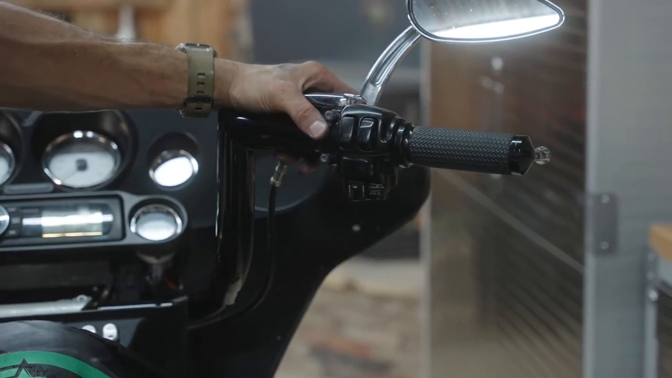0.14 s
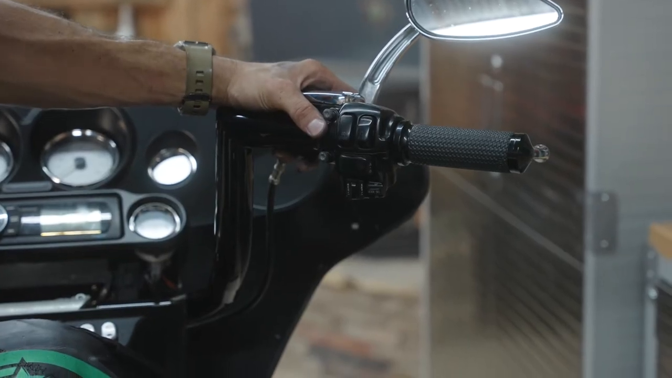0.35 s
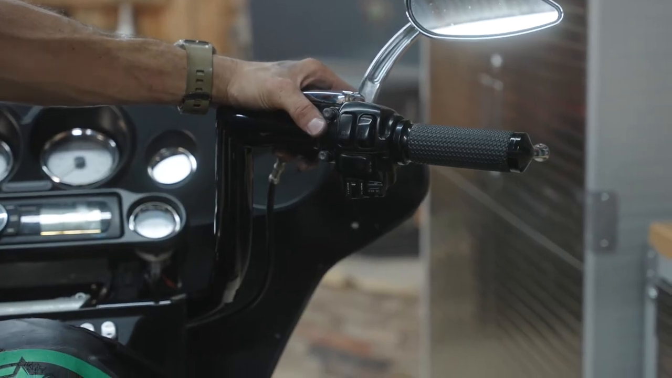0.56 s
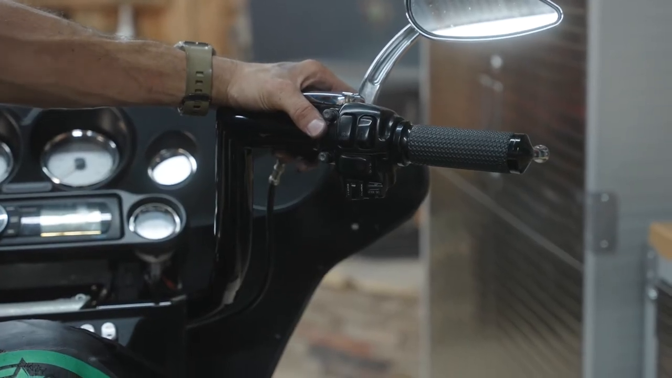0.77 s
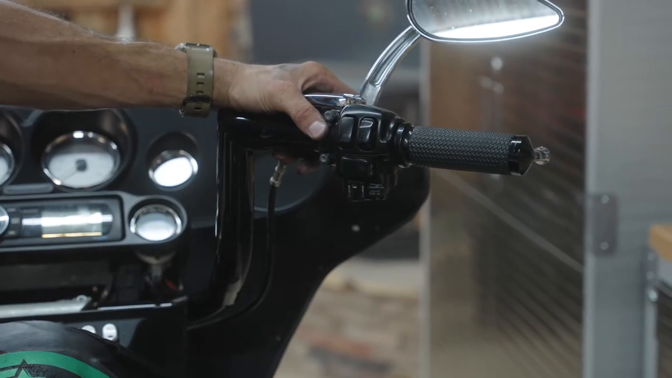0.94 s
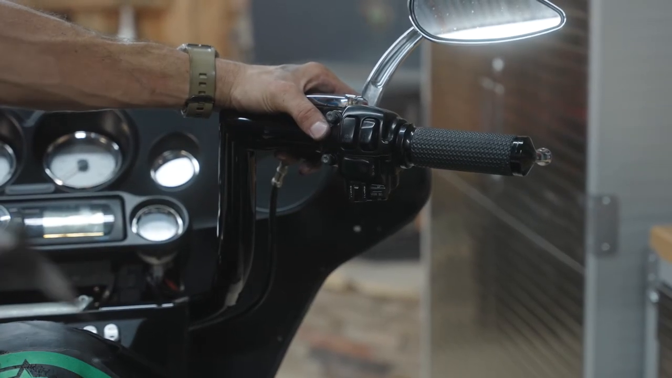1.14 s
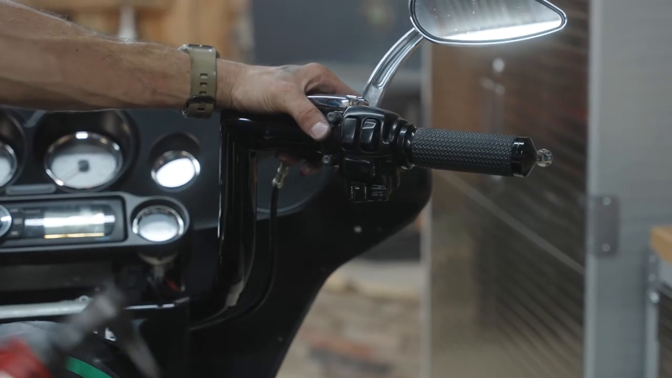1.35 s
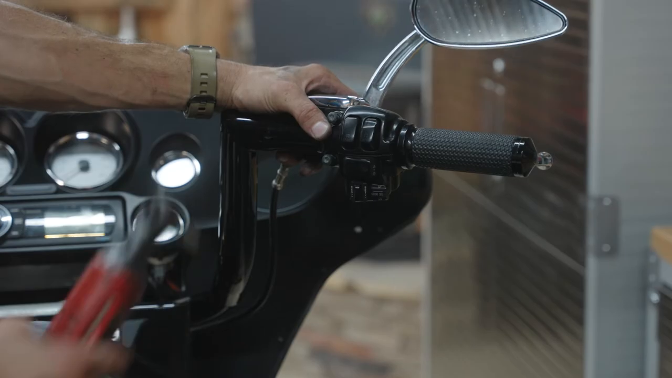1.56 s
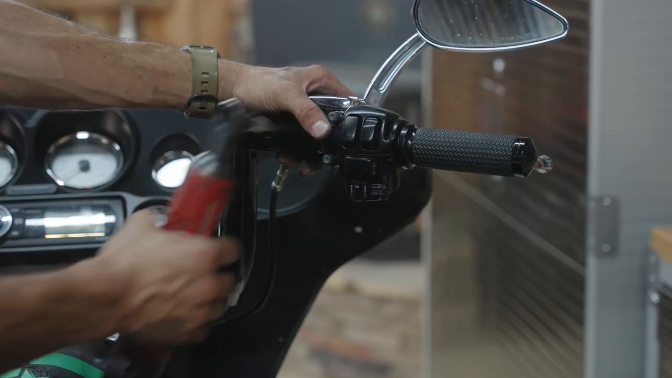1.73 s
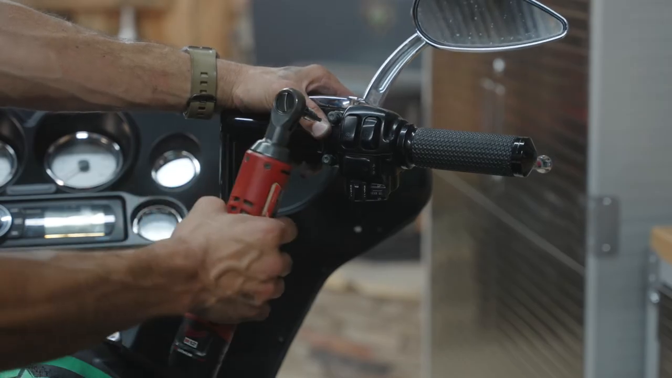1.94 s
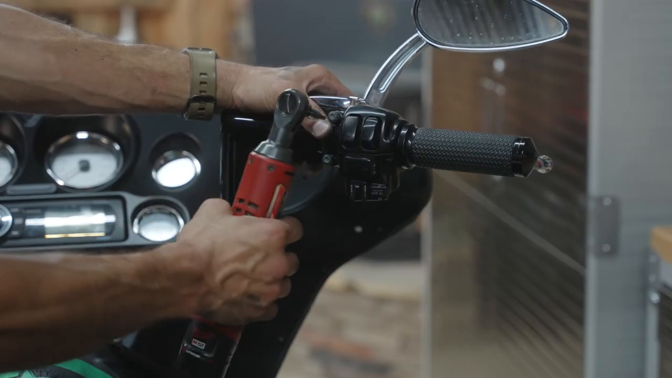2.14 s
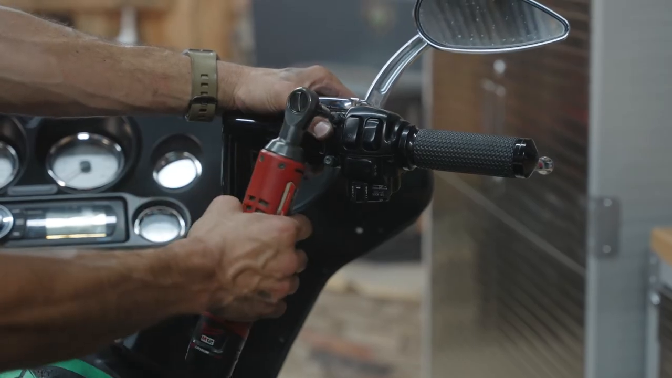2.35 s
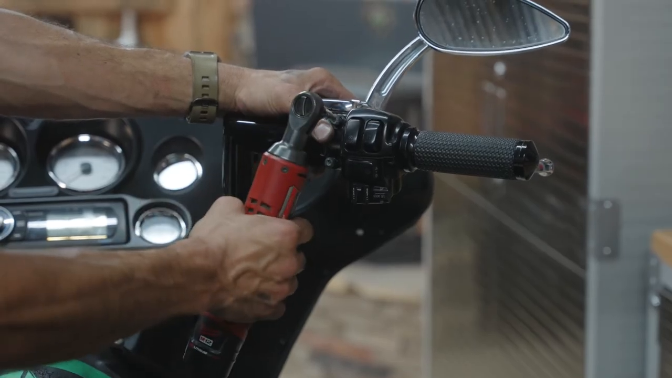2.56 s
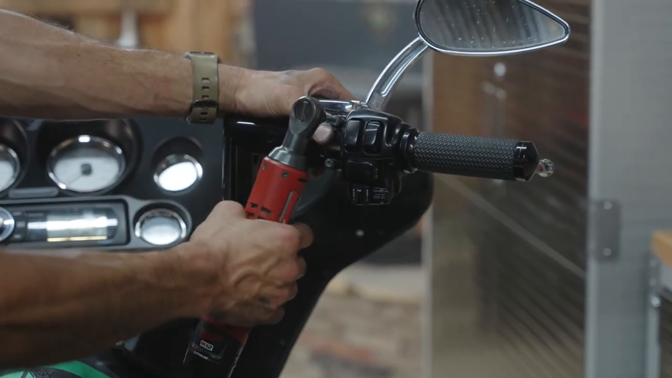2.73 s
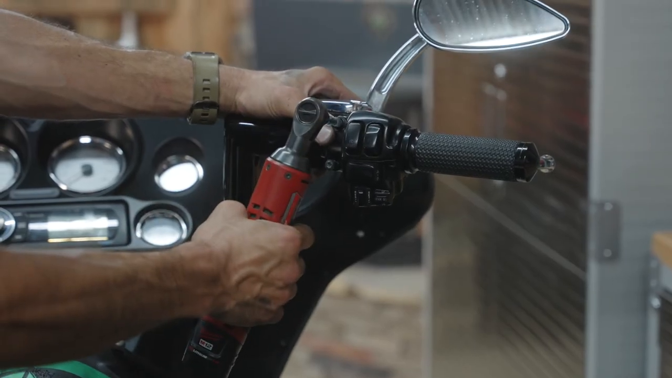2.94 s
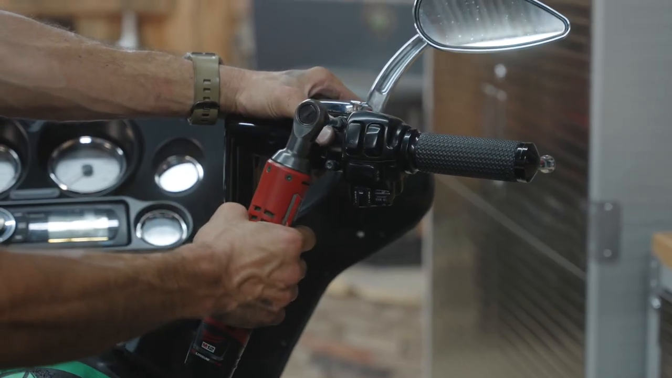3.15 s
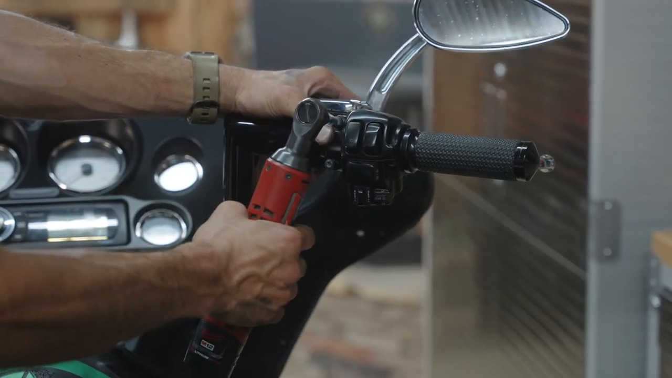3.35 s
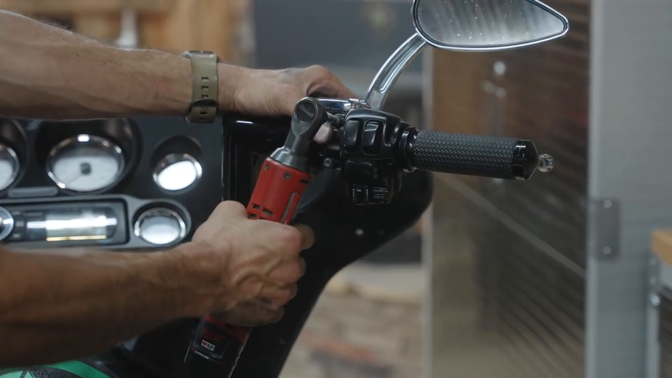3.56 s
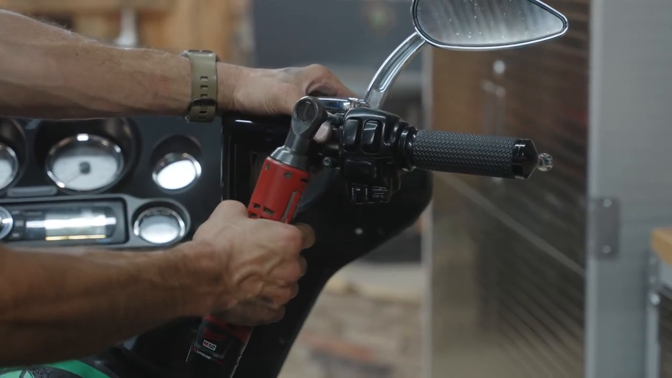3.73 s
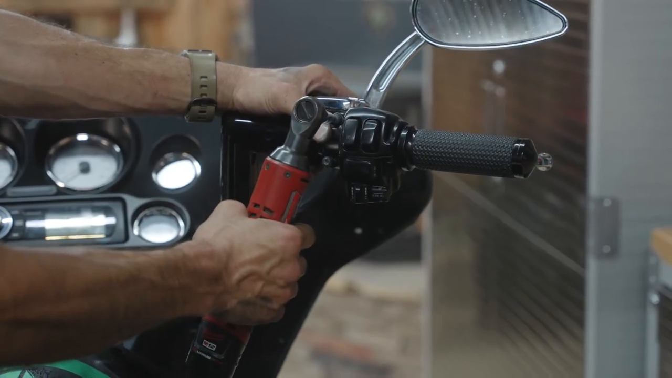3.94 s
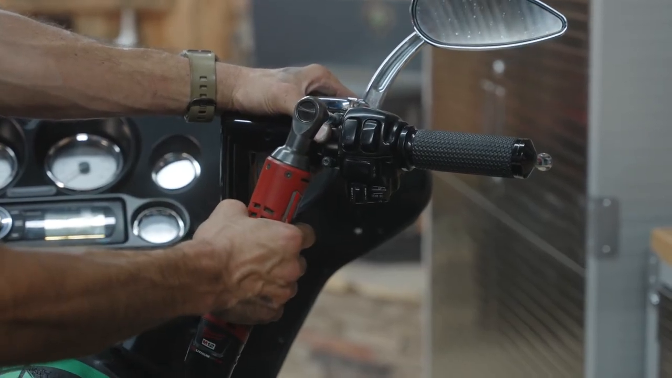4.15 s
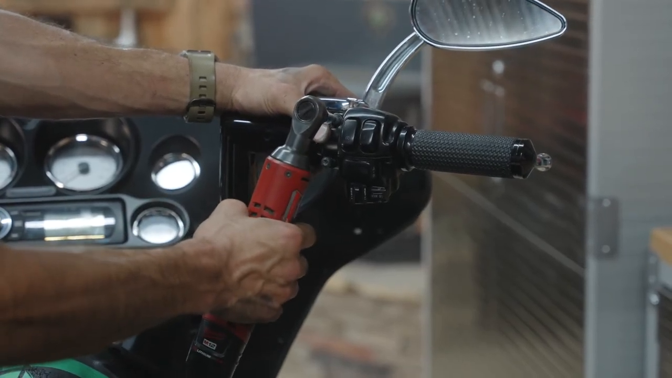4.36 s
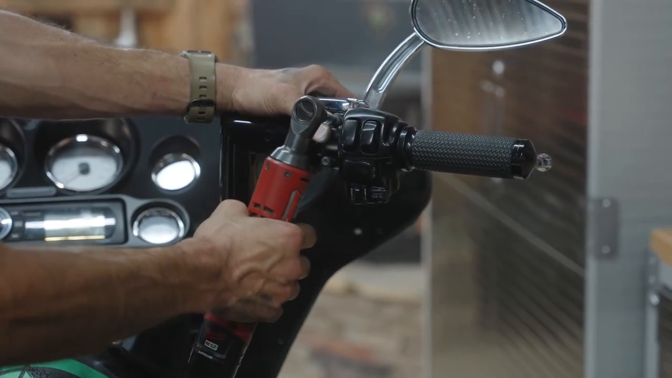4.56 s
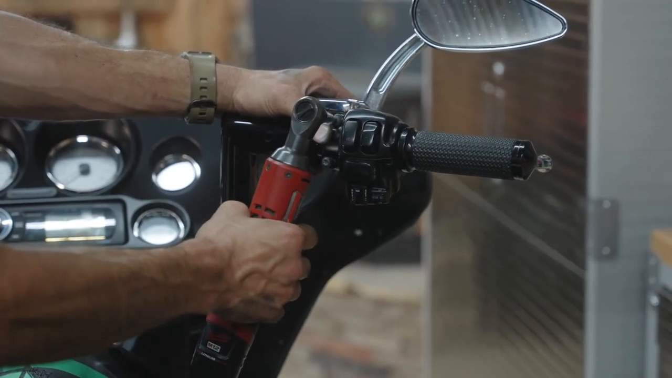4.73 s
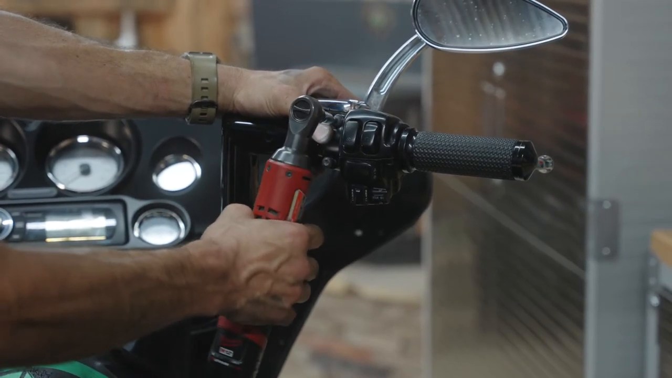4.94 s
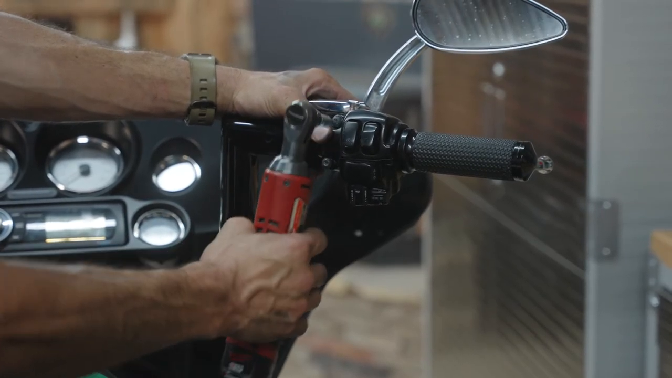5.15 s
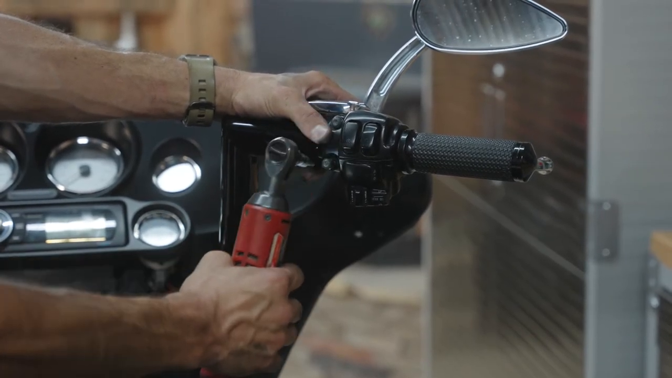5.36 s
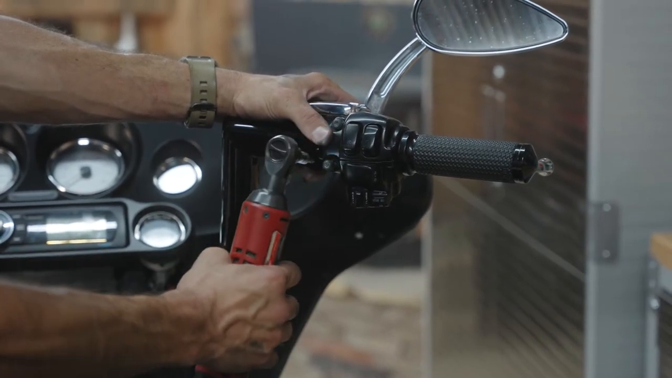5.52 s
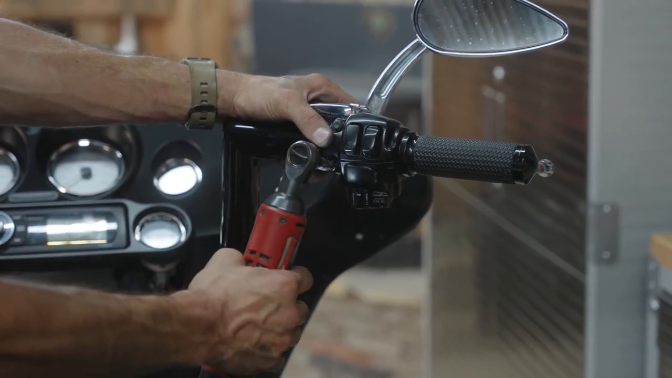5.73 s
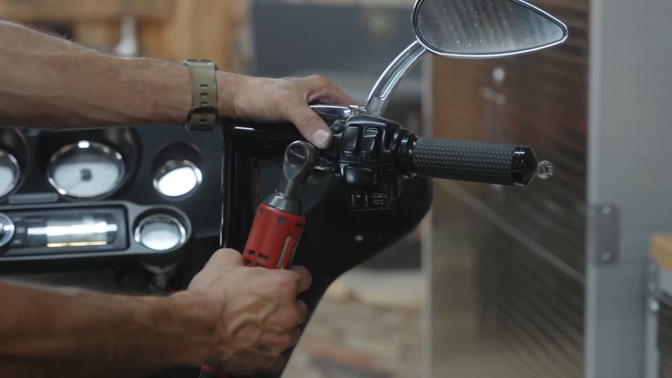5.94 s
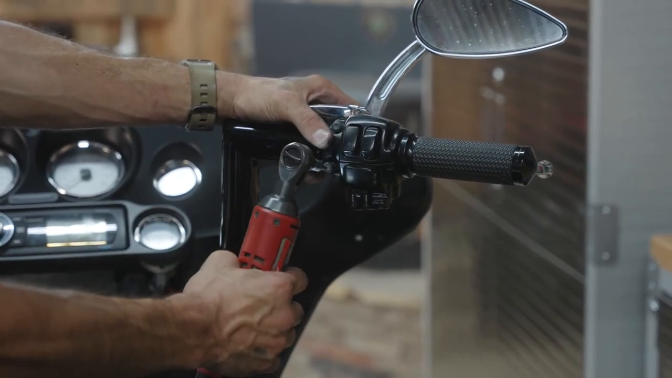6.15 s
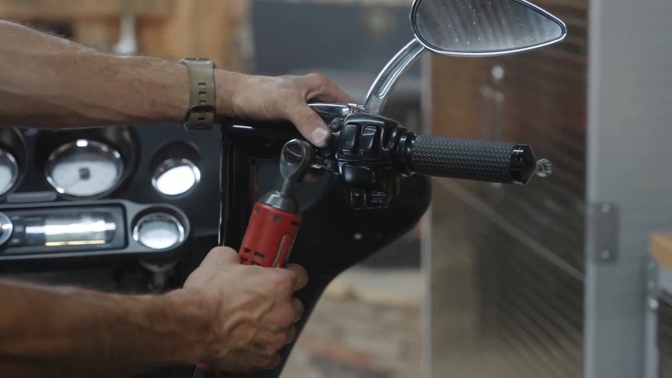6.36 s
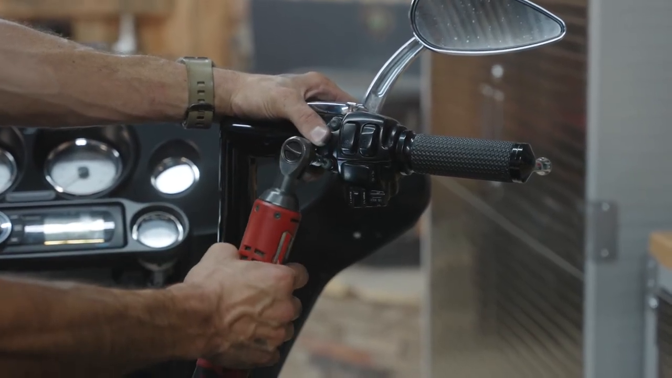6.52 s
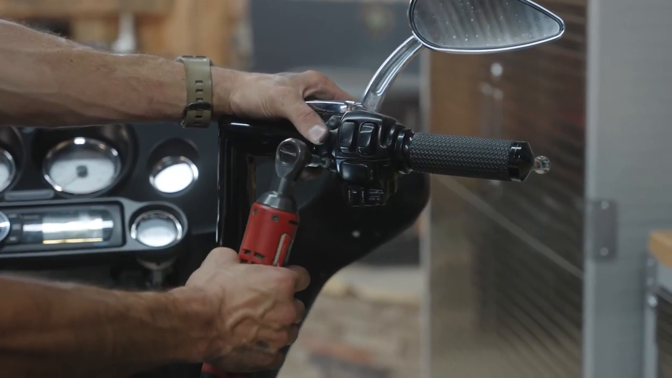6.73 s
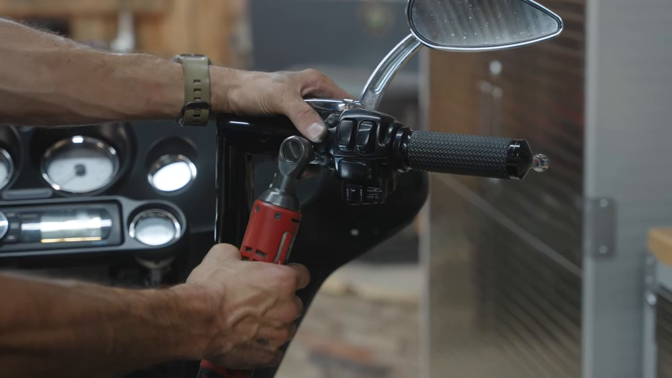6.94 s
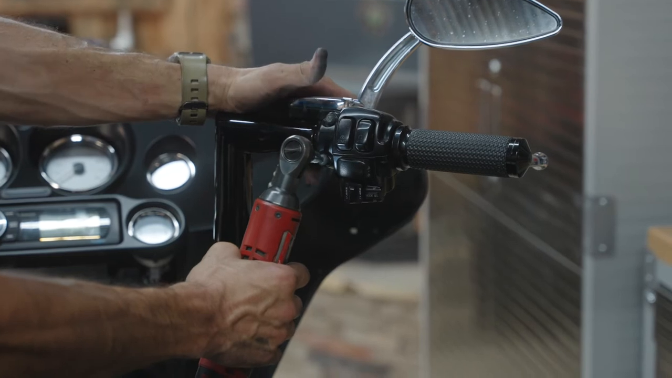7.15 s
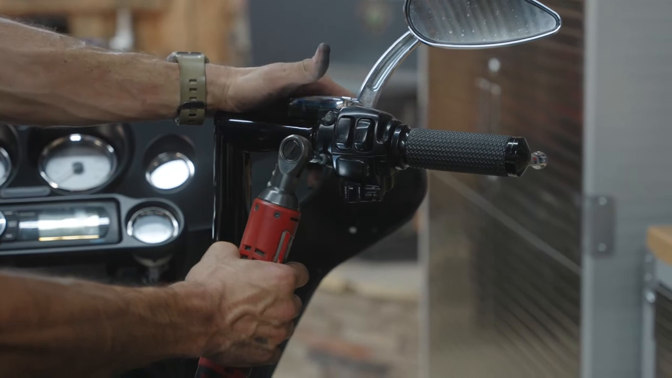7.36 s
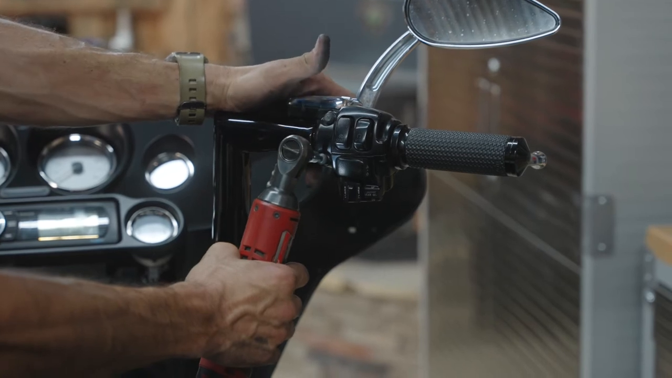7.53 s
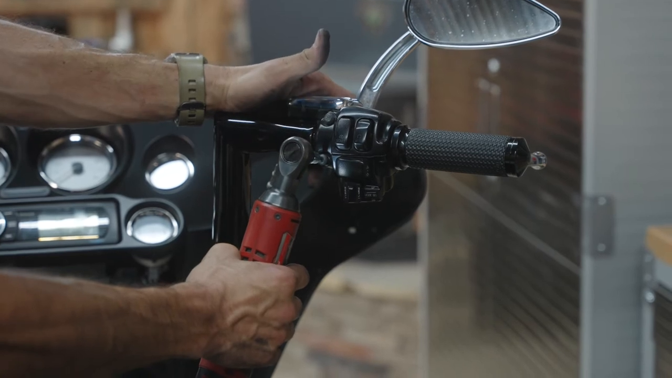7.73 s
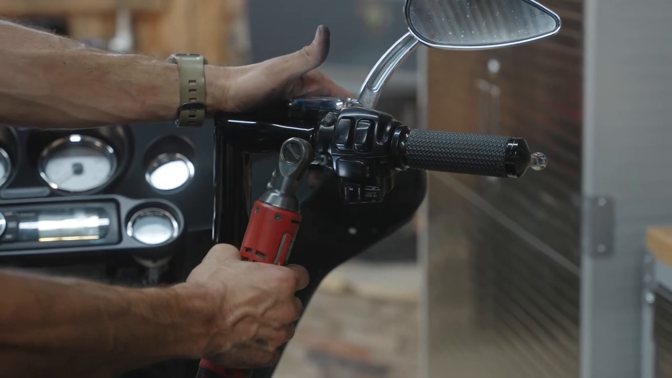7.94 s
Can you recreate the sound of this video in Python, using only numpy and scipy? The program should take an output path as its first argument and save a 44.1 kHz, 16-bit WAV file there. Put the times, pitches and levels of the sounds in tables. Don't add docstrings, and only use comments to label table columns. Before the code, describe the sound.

Soft plastic thumps, thin metal ticks and skin rubs come first, with quiet room murmur behind. An electric ratchet buzzes harshly for over two seconds, its dry knocking and bright gear rattle dropping in speed as it winds down. A short pause holds faint room tone and a few clinks, then a second burst wavers under load and continues to the end. Near camera microphone, short garage reverberation.

```python
import sys
import numpy as np
from scipy import signal
from scipy.fft import rfft, irfft
from scipy.io import wavfile
from scipy.ndimage import uniform_filter1d, minimum_filter1d

SR = 44100
rng = np.random.default_rng(int(sys.argv[2]) if len(sys.argv) > 2 else 0)


def amp(db):
    return 10 ** (np.asarray(db, float) / 20)


def write(x):
    x = np.atleast_2d(x).T
    wavfile.write(sys.argv[1], SR, np.round(np.clip(x, -1, 1) * 32767).astype(np.int16))


N = 352359
T = np.arange(N) / SR
TRIGGER_S, STOP_S = (2.565, 6.585), (4.99, 8.0)


def unit(x):
    return x / np.sqrt(np.mean(x ** 2))


def wander(seconds):
    return unit(uniform_filter1d(rng.standard_normal(N), int(seconds * SR)))


def response(points, lo=20, hi=32000.0):
    hz, db = np.transpose(points)
    f = np.maximum(np.fft.rfftfreq(8192, 1 / SR), 1)
    octaves_below = np.maximum(np.log2(max(lo, hz[0]) / f), 0)
    octaves_above = np.maximum(np.log2(f / min(hi, hz[-1])), 0)
    curve = np.interp(np.log(f), np.log(hz), db) - 60 * (octaves_below + octaves_above)
    cepstrum = irfft(np.log(amp(np.maximum(curve, -120))))
    cepstrum[1:4096] *= 2
    cepstrum[4097:] = 0
    h = irfft(np.exp(rfft(cepstrum)))[:4096]
    return h / np.sqrt(np.sum(h ** 2))


def ring(x, h):
    return signal.oaconvolve(x, h)[:N]


def mode(x, hz, width):
    return signal.lfilter(*signal.iirpeak(hz, hz / width, SR), x) * np.sqrt(SR / np.pi / width)


def bursts(times, db, ms, rise_ms=.02):
    index = (np.asarray(times) * SR).astype(int)
    marks = np.bincount(index, amp(np.asarray(db)) ** 2, N)[:N]
    power = signal.lfilter([1], [1, -np.exp(-2000 / (ms * SR))], marks)
    power = uniform_filter1d(power, 1 + int(rise_ms * SR / 1000))
    return np.sqrt(np.abs(power)) * rng.standard_normal(N)


# level_db_per_hz at pitch_hz; columns pitch_hz, level_db_per_hz
FLOOR_SPECTRUM = [(15, -61), (25, -37.5), (48, -21.5), (85, -16), (111, 5), (142, 2.5), (287, -5.5),
                  (613, -4), (702, -1), (804, -5.5), (1050, -5.5), (3120, -12.5), (7230, -24), (14600, -25),
                  (16300, -27.5)]
# low_hz, high_hz, level_db, duck_share [0-1], swell_db
FLOOR_LAYERS = [
    (20, 97, -73.5, 0.8, 3),
    (85, 200, -63.5, .35, -0.24),
    (208, 3500, -55.5, 0.81, 0),
    (3550, 16300, -63, 0.88, -0.45),
]
DUCK_DB, DUCK_ATTACK_S, DUCK_HOLD_S, RECOVER_DB_S = -11.5, 0.22, 0.61, 8.5
RUMBLE_CUT_DB = -11


def background():
    first, second = TRIGGER_S
    free = STOP_S[0] + DUCK_HOLD_S
    back = min(DUCK_DB + RECOVER_DB_S * (second - free), 0)
    duck = np.interp(T, (first, first + DUCK_ATTACK_S, free, second, second + DUCK_ATTACK_S),
                     (0, DUCK_DB, DUCK_DB, back, DUCK_DB))
    running = sum((T > a) * (T < b) * 1. for a, b in zip(TRIGGER_S, STOP_S))
    running = uniform_filter1d(running, SR // 4)
    out = np.zeros(N)
    for lo, hi, db, share, swell_db in FLOOR_LAYERS:
        level = db + share * duck + swell_db * wander(0.73) + 1.1 * wander(0.054)
        if hi < 100:
            level += RUMBLE_CUT_DB * running
        out += ring(rng.standard_normal(N), response(FLOOR_SPECTRUM, lo, hi)) * amp(level)
    return out


# start_s, length_s,
# level_db, pitch_hz, width_hz
RUBS = [(0.266, 0.04, -53, 2400, 4000), (0.275, .018, -48, 2200, 350), (0.275, .018, -49, 3200, 500),
        (0.0, .7, -65, 9000, 10000), (0.99, .21, -57, 2300, 3300), (1.13, 0.11, -49, 13000, 8000),
        (1.19, 0.04, -44, 6700, 19000), (1.148, .028, -48, 3350, 600), (1.148, .025, -49, 5450, 600),
        (1.14, .09, -54, 5200, 2500), (1.14, .09, -57, 1100, 1200), (1.325, .075, -58, 12000, 8000),
        (1.585, .1, -56, 9900, 9900), (1.58, .5, -57, 285, 180), (1.7, .3, -65, 5500, 3000),
        (4.77, .3, -53, 385, 90), (6.25, 0.23, -64, 400, 150), (6.112, .022, -57, 3900, 300),
        (6.228, 0.023, -57, 1300, 2000), (6.268, 0.04, -58, 1800, 3300), (6.512, 0.027, -56, 1100, 1200),
        (5.06, .05, -55, 1100, 500), (6.414, 0.016, -55, 7500, 8000), (6.44, 0.12, -60, 9200, 1000),
        (6.443, 0.027, -54, 4000, 8000)]


def rubs():
    out = np.zeros(N)
    grit = amp(2.0 * unit(uniform_filter1d(rng.standard_normal(N), 150)))
    for start, length, db, hz, width in RUBS:
        i = slice(int(start * SR), int((start + length) * SR))
        noise = rng.standard_normal(i.stop - i.start + 2048)
        noise = mode(mode(noise, hz, width), hz, width)[2048:]
        stroke = np.sin(np.pi * np.clip((T[i] - start) / length, 0, 1) ** 0.74)
        out[i] += amp(db) * grit[i] * unit(noise) * stroke
    return out


# start_s, level_db, pitch_hz
THUMPS = [(0.132, -43.5, 950), (0.281, -36.5, 1550), (0.441, -50, 2100), (0.533, -49, 1600),
          (0.559, -50, 1500), (0.577, -46, 1440), (0.869, -44, 600), (0.973, -50, 1020), (1.0, -39, 925),
          (1.021, -31, 1130), (1.05, -44, 842), (1.069, -34.5, 1290), (1.101, -50, 999), (1.233, -46, 1220),
          (1.577, -39, 1110), (1.59, -44.5, 900), (1.599, -40, 270), (2.339, -46, 1545), (2.361, -37, 1195),
          (2.483, -42, 1190), (5.007, -34.5, 1040), (5.786, -55, 730), (6.114, -50.5, 1400),
          (6.235, -48, 840), (6.269, -48, 1110), (6.4, -52, 1350), (6.439, -37, 970), (6.518, -40.5, 1100),
          (6.531, -45, 1300)]


def thumps():
    out = np.zeros(N)
    start, level, pitch = np.transpose(THUMPS)
    puffs = bursts(start, level - 1, 4.6)
    for s, hz, db in zip(start, pitch, level):
        i = int(s * SR)
        puff = np.pad(puffs[i:int((s + .009) * SR)], (0, 2048))
        shape = response([(.75 * hz, -3), (hz, 0), (2.1 * hz, -7), (3.25 * hz, -14)])
        out[i:i + 2048] += ring(puff, shape)[:2048]
        t = T[:2048]
        decay = np.exp(-t * hz / 1.6)
        out[i:i + 2048] += amp(db + 3) * decay * np.sin(2 * np.pi * hz * t)
    return out


# start_s, level_db, top_db (sharp top re level)
CLINKS = [(0.132, -60, 0), (0.279, -45, -3), (0.441, -57, 0), (0.559, -55, -2), (0.973, -61, -10),
          (1.02, -48, -6), (1.051, -46, -2), (1.067, -43.5, -7), (1.101, -46, -19), (1.352, -58, -2),
          (1.364, -53, 2), (1.576, -57, -2), (1.589, -41, 0), (1.602, -50, 8), (1.697, -52, -8),
          (2.339, -50.5, -5), (2.361, -39.5, -16), (2.483, -56, -10), (5.786, -62, -12),
          (6.114, -48.5, -25), (6.235, -56, -8), (6.27, -51, -24), (6.4, -58, -4), (6.421, -41, -8),
          (6.44, -35, -10), (6.519, -49, -12), (6.531, -47, -17)]


def clinks():
    start, mid, top = np.transpose(CLINKS)
    metal = response([(2500, -2.2), (4000, -1.5), (6000, 0.5), (9500, -1.2)])
    sharp = response([(9500, -0.033), (16000, -1.95)])
    return ring(bursts(start, mid - .5, 4), metal) + ring(bursts(start, mid + top + 4, 1.12), sharp)


# start_s, pitch_hz, level_db
WHISTLE = [(1.66, 6100, -84), (1.8, 7100, -66), (1.925, 7550, -69), (1.98, 6730, -72), (2.08, 6000, -77),
           (2.14, 5600, -85)]


def whistle():
    s, hz, db = np.transpose(WHISTLE)
    level = np.interp(T, s, db, -200, -200) - 6 + 5.5 * wander(.008)
    pitch = np.interp(T, s, hz) * (1 + .006 * wander(0.0029))
    return amp(level) * np.sin(2 * np.pi * np.cumsum(pitch) / SR)


def hands():
    out = rubs() + thumps() + clinks() + whistle()
    out = signal.lfilter(*signal.butter(2, 130, "high", fs=SR), out)
    return np.array([out, amp(-10.5) * out])


# start_s, speed_hz (turns per s)
CRANK_SPEED = [
    [(2.58, 30), (2.7, 79), (2.9, 65.5), (3.04, 83.3), (4.35, 83.2), (4.69, 47.5), (4.8, 38), (4.9, 25.2),
     (4.975, 14.5)],
    [(6.6, 30), (6.65, 68), (6.71, 78), (6.97, 55), (7.02, 62), (7.08, 83), (7.57, 84), (7.75, 76),
     (7.99, 74)],
]
PAWL_DROP_S = (4.9726, 7.324)
RELEASE_S = (4.35, 8.0)
FULL_SPEED_HZ = 83.3


def crank(run):
    speed = np.interp(T, *np.transpose(CRANK_SPEED[run]))
    turn = np.cumsum(speed) / SR
    turn -= turn[int(PAWL_DROP_S[run] * SR)]
    slack = FULL_SPEED_HZ / speed
    return speed, turn, slack, np.log2(slack) * (T > RELEASE_S[run])


# start_s, effort_db
LOAD = [
    [(2.64, 1.5), (2.73, -1), (2.81, -0.5), (2.95, -0.5), (3.14, 2), (3.3, 0.3), (4.45, -1), (4.75, -0.5),
     (4.99, -3.5)],
    [(6.65, 1.5), (6.75, 2), (6.9, 0), (7.09, 2), (7.32, 1.5), (7.5, 1), (7.99, -1)],
]
# start_s, drop_db
SLIPS = [(2.93, 0.5), (3.15, 1.5), (6.765, 4.5), (7.105, 2.5), (7.328, 5), (7.6, 1)]
# first_bolt_db, second_bolt_db, slowing_db (per octave of speed),
# effort_share [dB/dB], meshing_share [dB/dB]
VOICES = [
    (-35.5, -36, 5, 1.2, 0.73),
    (-32, -32.5, 6, 1.4, 0.75),
    (-25.5, -24.5, 8, 1, 1.1),
    (-21, -20.5, 7, 1.2, 1.2),
]


def part_levels(run, on, coasting, mesh):
    effort = np.interp(T, *np.transpose(LOAD[run]))
    for s, drop_db in SLIPS:
        if on[int(s * SR)]:
            effort -= drop_db * (T > s) * np.exp(-np.abs(T - s) / 0.089)
    levels = []
    for *db, slowing, share, bite in VOICES:
        level = db[run] - slowing * coasting + share * effort + bite * mesh
        levels.append(amp(level + 0.75 * wander(.04)))
    return levels


# angle_turns, grip_db, gear_case_db, head_db, pawl_db
KNOCKS = [
    (0, -2, -1, -1, 0),
    (.31, 1, 1, 1, -6),
    (.61, 0, 0, -2, -9),
]
COASTING = [(0, -6, -1, -1, 0), (.375, 2, 1, 1, -6), (.745, -7, -6, -3, -5)]


def knock_plan(turn, on, coasting):
    whole = np.arange(np.floor(turn[on][-1]), turn[on][0], -1)
    lag = np.clip(1.6 * np.interp(whole, turn, coasting), 0, 1)[:, None, None]
    pattern = (1 - lag) * np.array(KNOCKS) + lag * np.array(COASTING)
    play = 0.016 * rng.standard_normal((len(whole), len(KNOCKS)))
    angle = whole[:, None] + pattern[..., 0] + play
    return np.interp(angle, turn, T).ravel(), pattern[..., 1:].reshape(-1, 4)


def tooth_hits(turn, speed, slack):
    rotor_db = 3.5 * np.cos(2 * np.pi * 4 * turn)
    crank_db = 1.8 * np.cos(2 * np.pi * (turn - .1))
    return (rng.random(N) < 60 * speed / SR) * amp(rotor_db + crank_db) / slack ** 1.4


SHAKE = [
    [-23, -18, -21, -18, -19, -17, -23, -19, -15, -24, -24, -24, -23, -24, -26, -19],
    [-24, -16, -24, -17, -25, -21, -16, -18, -17, -20, -18, -20, -20, -24, -26, -24],
]


def grip_shake(run, turn):
    rock = turn + .01 * wander(0.033)
    shake = np.zeros(N)
    for k, db in enumerate(SHAKE[run], 2):
        shake += amp(db) * np.sin(2 * np.pi * (k * rock + rng.random()))
    return amp(-2.5) * shake


# teeth_per_turn, first_bolt_db, second_bolt_db
MESH = [(52.5, -22, -18), (57.8, -21, -20)]


def gear_mesh(run, turn):
    tone = np.zeros(N)
    for teeth_per_turn, *db in MESH:
        phase = 2 * np.pi * teeth_per_turn * turn
        tone += amp(db[run]) * (wander(.004) * np.sin(phase) + wander(.004) * np.cos(phase))
    return tone


# knock_ms, scatter_db, rattle_db, room_db
PARTS = [
    (7.6, 2.5, 0, -10.5),
    (6.4, -1.5, -2, -8.5),
    (2.08, 4.5, -1, -7.5),
    (2.2, 5.5, -0.5, -8),
]
# pitch_hz, level_db_per_hz (gear case and pawl on each bolt)
GRIP = [(120, -70), (200, -26), (237, -52), (294, -11), (357, -6), (457, -40.5), (487, -7), (537, -14),
        (566, -6.5), (733, 0), (879, -6), (990, 1), (2600, 6.5), (3380, -17.5), (5720, -120)]
GEARCASE = [
    [(1530, -31), (2600, -16.5), (2910, -7.5), (3520, -9), (4340, -1.5), (4860, -7.5), (5100, -16), (6630, -32), (11200, -120)],
    [(1530, -41.5), (2600, -6.5), (3640, -0.5), (4320, 4), (5050, -9), (6630, -35.5), (11200, -120)],
]
HEAD = [(3000, -37), (5100, -8.5), (6820, -1.5), (9770, -1), (10300, -5.5), (13400, -32.5), (22000, -120)]
PAWL = [
    [(9800, -16), (10300, -9.5), (11200, -1.5), (12200, -1), (13100, 2.5), (13750, 1.5), (14600, -5), (15400, 2.5), (15800, -3.5)],
    [(9800, -42.5), (10300, -11.5), (10900, 0), (12200, 2), (13100, 7.5), (13800, 5.5), (14700, -0.5), (15450, 5), (15800, -19)],
]
# pitch_hz, width_hz, first_bolt_db, second_bolt_db, slack_growth [exponent]
RINGS = [
    [(240, 20, -40, -39, .3), (365, 20, -28, -37, -1), (400, 22, -28, -27, .7), (430, 30, -36, -29, 0),
     (1470, 200, -10.5, -20, 1.5), (1150, 250, -20, -24, 1.9), (950, 250, -22, -22, 1.7)],
    [(5500, 500, -19, -17, 2.0), (3950, 350, -15, -18, 1.3)],
    [(7440, 300, -4.5, -22, .2)],
    [(12780, 8, -34, -34, 2.2), (12870, 5, -32, -33, 2.2), (12940, 5, -32, -32, 2.2),
     (13070, 8, -32, -32, 2.2), (13210, 9, -33, -33, 2.2)],
]


def parts(drives, run, slack):
    near = far = 0
    colours = (GRIP, GEARCASE[run], HEAD, PAWL[run])
    freedom = np.minimum(slack, 2.5)
    for drive, colour, rings, (*_, room_db) in zip(drives, colours, RINGS, PARTS):
        body = ring(drive, response(colour))
        tones = np.zeros(N)
        for hz, width, *db, growth in rings:
            tones += amp(db[run]) * mode(drive * freedom ** growth, hz, width)
        near = near + body + tones
        far = far + amp(room_db) * (body + amp(-6) * tones)
    return np.array([near, far])


# start_s (after the pull), level_db
ENGAGE = [(0, -43), (.025, -13.5), (.055, -8.5), (.075, 0)]
# start_s, grip_db, gear_case_db, head_db, pawl_db
CLACKS = [(2.5977, -40, -37, -27, -28), (2.6057, -35.5, -30, -18, -7), (2.6124, -32, -28.5, -21, -10),
          (4.9178, -48, -40, -38, -23), (4.973, -45, -42, -39, -20), (5.001, -41, -49, -29.5, -30),
          (5.007, -46, -43, -38, -43), (5.082, -70, -53, -62, -63), (6.615, -36, -40.5, -34, -40),
          (6.6243, -38, -37, -31, -7), (6.63, -30.5, -31, -21, -17), (6.652, -29.5, -24.5, -27, -13),
          (7.028, -25.5, -24, -16, -30)]


def ratchet(run):
    on = (T >= TRIGGER_S[run]) & (T < STOP_S[run])
    speed, turn, slack, coasting = crank(run)
    mesh = np.interp(T - TRIGGER_S[run], *np.transpose(ENGAGE))
    levels = part_levels(run, on, coasting, mesh)
    times, pattern = knock_plan(turn, on, coasting)
    free = times > RELEASE_S[run]
    blow = rng.standard_normal((times.size, 5))
    slow = np.interp(times, T, slack) ** 0.32
    teeth = tooth_hits(turn, speed, slack)
    clack_s, *clack_db = np.array([row for row in CLACKS if (row[0] > 6) == run]).T
    drives = []
    for k, (ms, scatter, rattle_db, _) in enumerate(PARTS):
        chance = 0.18 * blow[:, 4] + 0.54 * blow[:, k]
        hit_db = pattern[:, k] + scatter / slow ** 3 * chance
        knocks = bursts(times[~free], hit_db[~free], ms, .4)
        if free.any():
            knocks += bursts(times[free], hit_db[free], ms, 0.97)
        rattle = teeth * rng.standard_normal(N) * amp(1.7 * rng.standard_normal(N))
        drive = amp(0.84 * mesh) * knocks / knocks[on].std()
        drive += amp(rattle_db) * rattle / rattle[on].std()
        drive *= on / np.sqrt(uniform_filter1d(drive ** 2, int(.11 * SR)) + 1e-9) * levels[k]
        drives.append(drive + bursts(clack_s, clack_db[k], ms))
    drives[0] += on * grip_shake(run, turn) * levels[0] / slack
    drives[1] += on * gear_mesh(run, turn) * levels[1] / slack ** 3
    return parts(drives, run, slack)


CHOPPER_S = (2.9, 6.582)
# pitch_hz, level_db
CHOPPER = [
    [(1841, -50), (3720, -57), (5556, -58), (7402, -52), (9205, -64), (11122, -62), (12893, -64), (14799, -72)],
    [(1836, -47), (3666, -61), (5518, -54), (7413, -59), (9254, -67), (11117, -68), (12888, -69)],
]


def chopper():
    t, out = T[:SR // 20], np.zeros(N)
    fade = np.interp(t, (0, .008, .02, .045), (0, 1, 1, 0))
    for s, lines in zip(CHOPPER_S, CHOPPER):
        whine = sum(amp(db + 0.5) * np.sin(2 * np.pi * hz * t) for hz, db in lines)
        out[int(s * SR):][:len(t)] = whine * fade
    return out


def room(x):
    t = T[:SR // 2]
    low = rng.standard_normal(len(t)) * amp(-60 * t / 0.76)
    high = rng.standard_normal(len(t)) * amp(-60 * t / 0.38)
    low = signal.lfilter(*signal.butter(1, 3000, fs=SR), low)
    tail = (low + 0.92 * high) * np.clip(t / 0.013 - .3, 0, 1)
    return ring(x, tail / np.sqrt(np.sum(tail ** 2)))


def scene():
    near, far = hands() + ratchet(0) + ratchet(1)
    return (background() + near + room(far) + chopper())[None]


def band_limit(x):
    return signal.sosfilt(signal.butter(12, 16860, fs=SR, output="sos"), x)


def record(dry):
    top_cut = signal.ellip(10, .2, 45, 15720, fs=SR, output="sos")
    x = signal.sosfilt(top_cut, dry)
    gain = minimum_filter1d(np.minimum(1, .74 / (np.abs(x) + 1e-9)), size=89)
    mix = x * uniform_filter1d(gain, size=45)
    return band_limit(mix)


dry = scene()
out = record(dry)
write(out)
```